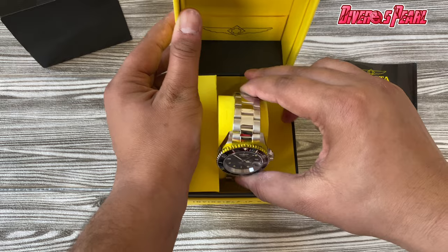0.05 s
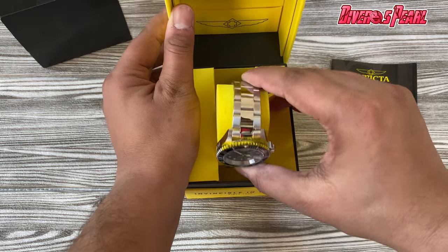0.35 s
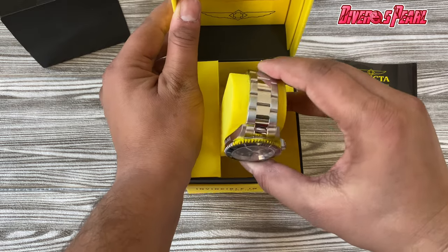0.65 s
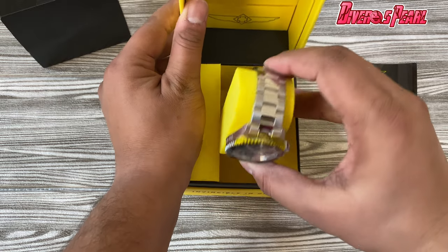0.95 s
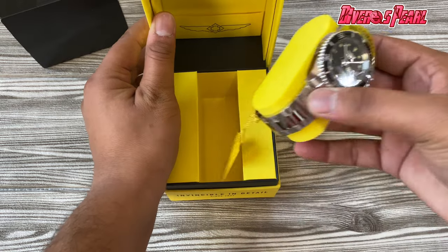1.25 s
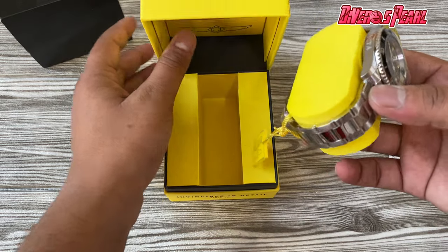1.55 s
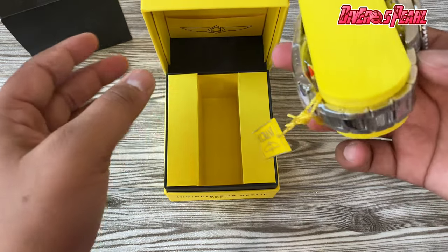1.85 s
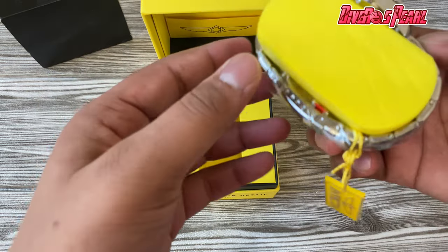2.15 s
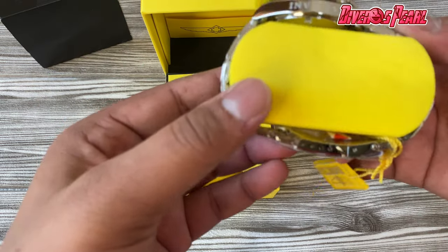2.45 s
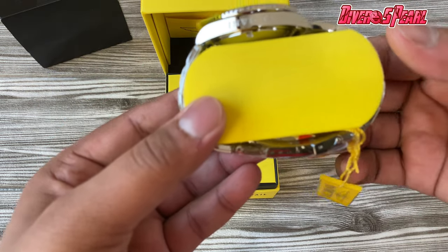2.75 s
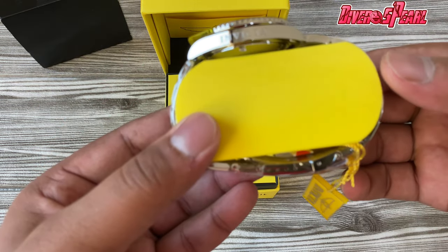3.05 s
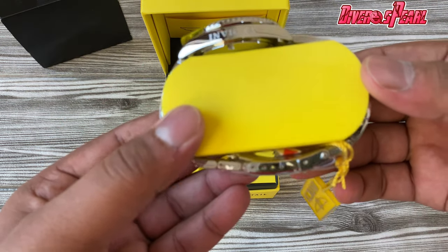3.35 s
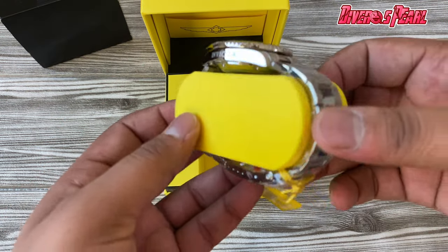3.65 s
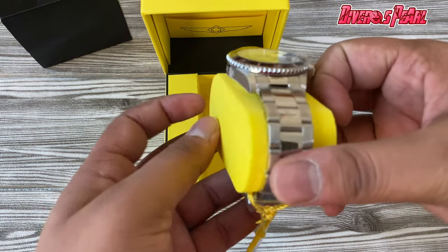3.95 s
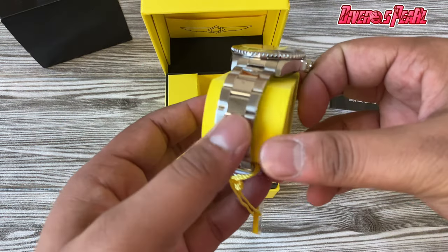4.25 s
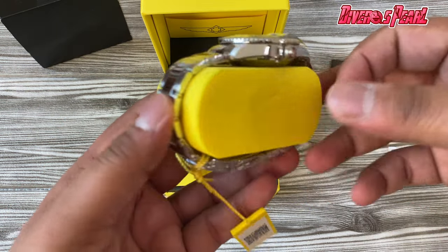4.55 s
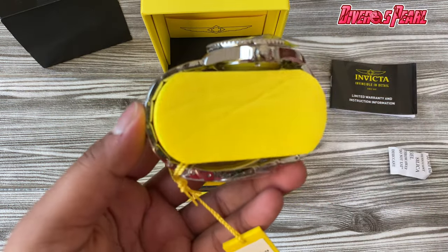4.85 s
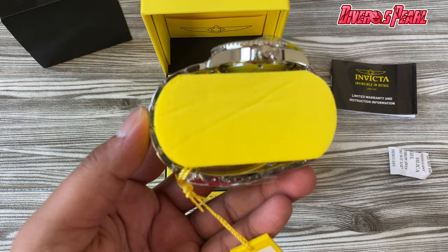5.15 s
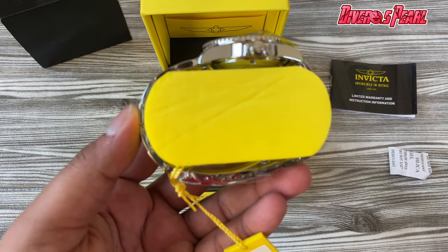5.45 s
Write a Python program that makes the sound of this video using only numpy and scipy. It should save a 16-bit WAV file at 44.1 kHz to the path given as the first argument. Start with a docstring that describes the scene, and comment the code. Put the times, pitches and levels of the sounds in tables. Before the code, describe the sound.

A wristwatch on a foam pillow scrapes out of a cardboard box, with taps, one sharp snap and small link ticks over a low hum.

```python
"""A foam pillow scrapes along cardboard walls as a steel wristwatch is worked out of its box, close to
one microphone in a small room. A hanging tag taps the box and the watch gives one sharp, hollow snap.
Then it is turned in the hands: bracelet links tick against each other and fingers brush the pillow.
The handling is nearly dry; a mains hum, low rumble and faint hiss lie behind it throughout."""
import sys
import numpy as np
from scipy import signal
from scipy.fft import rfft, irfft, next_fast_len
from scipy.io import wavfile
from scipy.ndimage import uniform_filter1d, map_coordinates

SR = 44100
rng = np.random.default_rng(int(sys.argv[2]) if len(sys.argv) > 2 else 0)


def materialize(psi):
    """Save the field psi as 16-bit PCM at rate SR to the path in sys.argv[1].

    A 1-D psi becomes a single channel; in a 2-D psi each row is a channel.
    """
    bounded = np.clip(np.atleast_2d(psi).T, -1, 1)
    quanta = np.round(bounded * 32767).astype(np.int16)
    wavfile.write(sys.argv[1], SR, quanta)


N = 247401

# decay of the room: freq_hz, t60_s
ROOM_DECAY = [(200, .4), (1100, 0.65), (2500, 0.56), (6000, 0.44), (14000, 0.54)]
# colour of the room's tail, its hiss and its rumble: freq_hz, relative_db
ROOM_COLOUR = [(200, 11.5), (700, 0.5), (1100, -1.5), (1600, -5.5), (2400, -2.5), (3500, -1), (7000, -5),
               (14000, -9.5)]
HISS = [(100, -16.5), (135, -7.5), (220, -14), (340, -21), (480, -21.5), (650, -25), (1000, -28.5),
        (1700, -33), (6500, -35.5), (10000, -37.5), (13300, -37), (15000, -45), (15800, -58)]
RUMBLE = [(20, -35.5), (35, -24), (48, -7.5), (58, 2), (70, -4), (82, -3.5), (120, -10), (160, -16.5)]
# mains hum and the room's wavering low tones, before the swell: pitch_hz, rms_db
MAINS_HUM = [(100, -46.5)]
LOW_TONES = [(65, -63), (145, -66.5), (191, -69.5), (219, -75), (269, -81)]
# slow swell of hum, low tones and rumble: time_s, gain_db
LOW_SWELL = [(0, -3), (.5, -1.5), (1.2, 0), (2.2, 0.5), (2.9, -2.3), (4, -2.5), (5.6, -2.5)]

# fingers brushing the pillow, and tugs along the box walls: top_speed_s, length_s, scrape_db, hollow_db
FINGER_STROKES = [(1.861, 0.024, -66.5, 3), (2.068, 0.018, -50, -4.5), (2.224, 0.014, -50.5, -3.5),
                  (2.33, 0.045, -77.5, 8.5), (2.485, .08, -61.5, 6.5), (2.533, 0.021, -59, -2),
                  (2.605, 0.087, -61.5, 4.5), (2.76, 0.19, -54, 4), (3.467, 0.043, -48.5, -0.5),
                  (3.638, 0.07, -51, -1), (3.833, 0.015, -60.5, -2), (3.963, 0.021, -55.5, 4.5),
                  (3.991, 0.024, -52, -3), (4.136, 0.048, -53, 0), (4.19, .05, -59.5, -3.5),
                  (4.4, 0.057, -53, -0.5), (4.44, 0.035, -49.5, -2), (4.98, 0.066, -66.5, 1.5)]
PILLOW_TUGS = [(.04, 0.12, -45, 5), (.135, 0.11, -45.5, 3.5), (.308, 0.063, -51, 1), (.385, .08, -40, 1),
               (.445, .07, -47.5, 3.5), (.54, 0.067, -54.5, -1), (.661, 0.049, -48.5, -3),
               (.813, .074, -41.5, 1.5), (.955, .054, -42.5, -2), (.983, 0.027, -39.5, -2.5),
               (1.087, 0.04, -48.5, 4)]
# hollow body and scrape of skin and of box wall, and the fizz of both: freq_hz, relative_db
SKIN_BODY = [(300, -15), (600, -2.5), (1050, -5.5), (1500, -1.5), (2100, 0.5), (2700, -5), (3400, -10.5)]
SKIN_SCRAPE = [(1700, -21), (2400, -2.5), (3200, -1.5), (4300, 0), (5200, -1), (7000, -7), (9000, -30)]
WALL_BODY = [(250, -15.5), (450, -20.5), (620, -9.5), (900, -4), (1200, -1.5), (1400, -8), (1650, -3),
             (2200, -4), (2700, -5.5), (3400, -25)]
WALL_SCRAPE = [(1700, -36), (2400, 0), (3000, 1.5), (4300, -0.5), (5800, -2.5), (7000, -9), (9000, -35)]
FIZZ = [(5500, -10), (7200, -1), (8500, 0), (10300, -1), (13000, 2), (14500, -0.5), (16000, -23)]

# dull taps of pillow and tag on the cardboard: start_s, level_db, pitch_hz
BOX_TAPS = [(.290, -42.5, 333), (.5228, -36, 790), (.5737, -27, 880), (.6735, -35.5, 825),
            (.8892, -33.5, 1113), (.992, -40, 286), (1.0435, -37, 923), (1.0625, -40.5, 702),
            (1.3113, -29.5, 760), (1.3547, -30, 820), (1.3668, -28, 792), (1.393, -37, 800),
            (1.4283, -28.5, 847)]
# modes of the cardboard: pitch_ratio, level_db, t60_s
BOX_MODES = [(0.992, 0, .015), (1.45, -8, 0.013), (.76, -9, .02)]
# spells in which the bracelet shifts: start_s, end_s, ticks_per_s, base_db
BRACELET_SHIFTS = [(1.1, 1.322, 35, -58.5), (2.03, 2.447, 24, -57.5), (3.719, 4.3, 24, -56),
                   (4.447, 4.664, 12, -59)]
# clear clicks of the links: start_s, level_db, brightness_db
LINK_CLICKS = [(.3249, -38.5, 14.5), (1.214, -42.5, 11), (1.2348, -27.5, 1), (1.3138, -33.5, 5.5),
               (1.3388, -34.5, 9.5), (1.5175, -34.5, -5), (1.5334, -40, 1), (2.1388, -46.5, -8.5),
               (2.1869, -47, -9), (2.1971, -39.5, -7), (2.3821, -53.5, 14), (2.8497, -44.5, 7),
               (3.8087, -50, 0.5), (3.9231, -43.5, 2.5), (4.0729, -40, -1), (4.5792, -50, 15),
               (4.5858, -38, 4), (5.1452, -46, -3)]
# low, middle and high band of a contact: freq_hz, relative_db
CLACK = [(500, -23.5), (1100, 2), (2100, -1.5), (3000, -1.5), (4500, -27.5)]
CLICK = [(2000, -21.5), (3500, -1), (6000, 1.5), (7500, 0.5), (10000, -22)]
TICK = [(6000, -21), (8500, -1), (13000, 3), (15000, 0.5), (16500, -12)]
# bright crack and hollow body of the snap: freq_hz, relative_db
SNAP_CRACK = [(2000, -26.5), (3400, -0.5), (4600, -6), (6400, 0), (8000, -3.5), (9600, -7), (11000, -4.5),
              (13000, -2.5), (14500, -4.5), (16500, -18)]
SNAP_BODY = [(450, -36), (620, -32.5), (780, -15.5), (930, -1.5), (1120, 1), (1380, -7), (1750, -7),
             (1950, -13), (2130, -8), (2400, -13.5), (3500, -31.5), (13000, -34.5), (16500, -46.5)]
# thin ring of the steel: pitch_hz, level_db, t60_s
STEEL_MODES = [(2121, -24.5, .028), (2964, -31.5, .022), (4500, -31.5, 0.025), (6740, -30, .016),
               (7730, -32.5, .018)]


def amp(db):
    return 10 ** (np.asarray(db) / 20)


def unit_rms(x):
    return x / np.sqrt(np.mean(x ** 2) + 1e-20)


def along(points, hz):
    """Read (freq_hz, value) points on a log frequency axis."""
    freqs, values = np.transpose(points)
    return np.interp(np.log(hz + 1), np.log(freqs), values)


def gain(spectrum, hz):
    """Gain of a spectrum, falling steeply beyond its ends."""
    low_hz, high_hz = spectrum[0][0] / 2, spectrum[-1][0] * 2
    skirts = (1 + (low_hz / (hz + 1)) ** 8) * (1 + (hz / high_hz) ** 8)
    return amp(along(spectrum, hz)) / np.sqrt(skirts)


def coloured(x, spectrum):
    """Shape x by a spectrum at zero phase and scale it to rms 1."""
    size = next_fast_len(len(x) + 8192)
    response = gain(spectrum, np.fft.rfftfreq(size, 1 / SR))
    return unit_rms(irfft(rfft(x, size) * response, size)[:len(x)])


def wobble(rate_hz):
    """A smooth random curve through rate_hz knots a second."""
    knots = rng.standard_normal(int(N * rate_hz / SR) + 4)
    return map_coordinates(knots, [np.arange(N) * rate_hz / SR])


def struck(force, spectrum):
    """A contact force through a causal filter, with the energy of a click peaking near 1."""
    size = len(force)
    cepstrum = irfft(np.log(gain(spectrum, np.fft.rfftfreq(size, 1 / SR)) + 1e-4))
    response = np.exp(rfft(2 * cepstrum[:size // 2], size))
    click = irfft(rfft(force) * response)
    return 2.3 * click / np.linalg.norm(click)


def decay(t, t60_s):
    return np.exp(-np.log(1000) * t / t60_s)


def burst(spectrum, t60_s, size=4096):
    """A sharp, fast-dying contact noise."""
    return struck(rng.choice([-1, 1], size) * decay(np.arange(size) / SR, t60_s), spectrum)


def ring(modes, attack_s, size=4096):
    """Damped modes that swell during the contact."""
    t = np.arange(size) / SR
    tones = sum(amp(db) * decay(t, t60_s) * np.sin(2 * np.pi * hz * t) for hz, db, t60_s in modes)
    return (1 - np.exp(-t / attack_s)) * tones


def add(track, start_s, x):
    part = track[round(start_s * SR):][:len(x)]
    part += x[:len(part)]


def room_tone():
    """The room by itself: a slightly unsteady mains hum, wavering low tones, rumble and hiss."""
    t = np.arange(N) / SR
    hum = sum(np.sqrt(2) * amp(db) * np.sin(2 * np.pi * hz * t + .046 * wobble(3))
              for hz, db in MAINS_HUM)
    drone = np.zeros(N)
    for hz, db in LOW_TONES:
        waver = amp(4.45 * wobble(5))
        drone += amp(db) * unit_rms(waver * np.sin(2 * np.pi * hz * t + 1.2 * wobble(5)))
    rumble = amp(-61.5) * coloured(rng.standard_normal(N), RUMBLE)
    hiss = amp(-64) * coloured(rng.standard_normal(N), HISS)
    swell = amp(np.interp(t, *np.transpose(LOW_SWELL)))
    return swell * (hum + drone + rumble) + hiss


def room_tail(x, delay_s=.0016, build_s=.002):
    """The small room's diffuse tail, in which each frequency dies at its own speed."""
    hz, frame_s, bands = signal.stft(rng.standard_normal(SR * 3 // 4), SR, nperseg=256)
    fade = decay(frame_s, along(ROOM_DECAY, hz)[:, None]) * amp(along(ROOM_COLOUR, hz))[:, None]
    tail = signal.istft(bands * fade, SR, nperseg=256)[1]
    age_s = np.maximum(np.arange(len(tail)) / SR - delay_s, 0)
    tail *= 1 - np.exp(-age_s / build_s)
    return signal.fftconvolve(x, tail / np.linalg.norm(tail))[:N]


def wall_echo(x, delay_s=.0167):
    """The nearest wall sends one duller reflection back to the microphone."""
    out = np.zeros(N)
    dulled = signal.sosfilt(signal.butter(1, 3500, fs=SR, output="sos"), x)
    add(out, delay_s, amp(-13) * dulled)
    return out


def friction(spectrum, grit_db, patchy_db):
    """Dense, uneven micro-slips; the gap between hand and pillow keeps shifting their colour."""
    slips = rng.standard_normal(N) * amp(grit_db * wobble(1500))
    bands = signal.stft(slips, nperseg=512)[2]
    patches = uniform_filter1d(rng.standard_normal(bands.shape), size=4, axis=0)
    patches = uniform_filter1d(patches, size=11, axis=1)
    shifting = signal.istft(bands * amp(patchy_db * unit_rms(patches)), nperseg=512)[1][:N]
    return coloured(shifting, spectrum)


def sliding(strokes, rise_share, steepness, body_db, body_growth, fizz_db, creep=0):
    """Envelopes of body, scrape and fizz: strokes swell and fade, louder and brighter when faster."""
    def band_power(scrape, hollow_db):
        # body_db holds at a scrape of -50 dB and grows by body_growth dB per dB
        body = amp(body_db + hollow_db) * (scrape / amp(-50)) ** body_growth
        return np.array([body, scrape, amp(fizz_db) * scrape]) ** 2

    t = np.arange(N) / SR
    power = band_power(creep + np.zeros(N), 0)
    for top_speed_s, length_s, scrape_db, hollow_db in strokes:
        near = np.abs(t - top_speed_s) < 3 * length_s
        offset_s = t[near] - top_speed_s
        flank_s = length_s * np.where(offset_s < 0, rise_share, 1 - rise_share)
        stroke = np.exp(-np.abs(offset_s / flank_s) ** steepness)
        power[:, near] += band_power(amp(scrape_db) * stroke, hollow_db)
    return np.sqrt(power) * amp(.89 * wobble(70))


def fingers():
    """Skin brushes the pillow as the watch is turned."""
    body, scrape, fizz = sliding(FINGER_STROKES, rise_share=.64, steepness=2.3,
                                 body_db=-58, body_growth=.53, fizz_db=-1.5)
    return (body * friction(SKIN_BODY, grit_db=2, patchy_db=3)
            + scrape * friction(SKIN_SCRAPE, grit_db=2.5, patchy_db=3.5)
            + fizz * friction(FIZZ, grit_db=2.5, patchy_db=3))


def pillow(creep_db=-67.5, clear_s=1.11, release_s=.01):
    """The pillow is tugged along the box walls and creeps between tugs until it comes clear."""
    inside = .5 - .5 * np.tanh((np.arange(N) / SR - clear_s) / release_s)
    body, scrape, fizz = sliding(PILLOW_TUGS, rise_share=.53, steepness=2.5, body_db=-48.5,
                                 body_growth=.6158, fizz_db=-3, creep=amp(creep_db) * inside)
    return (body * friction(WALL_BODY, grit_db=1, patchy_db=2)
            + scrape * friction(WALL_SCRAPE, grit_db=1, patchy_db=2.5)
            + fizz * friction(FIZZ, grit_db=1, patchy_db=1))


def box_taps(chatter_gap_s=.013, chatter_db=-8, loss_db=.5):
    """Soft contacts ring the cardboard at a pitch set by the spot hit; the tag chatters to rest."""
    out = np.zeros(N)
    last_s, last_db, last_hz = BOX_TAPS[-1]
    chatter = [(last_s + chatter_gap_s * (k + 1), last_db + chatter_db - loss_db * k, last_hz)
               for k in range(3)]
    for start_s, level_db, pitch_hz in list(BOX_TAPS) + chatter:
        modes = [(pitch_hz * ratio, db + rng.normal(0, 1), t60_s) for ratio, db, t60_s in BOX_MODES]
        knock = ring(modes, attack_s=.0009)
        # the small panel radiates little below its lowest mode
        knock = signal.sosfilt(signal.butter(2, pitch_hz * .6, "high", fs=SR, output="sos"), knock)
        contact = amp(-13.5) * burst(CLACK, t60_s=.012) + amp(-20.5) * burst(CLICK, t60_s=.01)
        add(out, start_s, amp(level_db) * (knock / np.abs(knock).max() + contact))
    return out


def bracelet_ticks():
    """The bracelet shifts in the hands with tiny random ticks."""
    out = np.zeros(N)
    for start_s, end_s, ticks_per_s, base_db in BRACELET_SHIFTS:
        length_s = end_s - start_s
        for when, strength in rng.random((round(length_s * ticks_per_s), 2)):
            tick = burst(TICK, t60_s=.0084) + .63 * burst(CLICK, t60_s=.008)
            add(out, start_s + when * length_s, amp(base_db + 5 + 10 * strength) * tick)
    return out


def link_clicks():
    """Steel links touch, damped at once by the pillow; a harder contact trades clack for tick."""
    out = np.zeros(N)
    for start_s, level_db, brightness_db in LINK_CLICKS:
        add(out, start_s, amp(level_db - brightness_db - 2.5) * burst(CLACK, t60_s=.014))
        add(out, start_s, amp(level_db) * burst(CLICK, t60_s=.011))
        add(out, start_s, amp(level_db + brightness_db - 1.1) * burst(TICK, t60_s=.0082))
    return out


def watch_snap(start_s=1.5368):
    """A crack, a hollow clack and a trace of steel: one path to the microphone, one into the room."""
    blow = signal.unit_impulse(4096)
    clack = amp(1.5) * struck(blow, SNAP_BODY) + amp(2.5) * ring(STEEL_MODES, attack_s=.00035)
    direct, spread = np.zeros((2, N))
    add(direct, start_s, amp(-6.5) * burst(SNAP_CRACK, t60_s=.0068))
    add(direct, start_s + .0003, clack)
    # summed over all directions, the crack has a smooth spectrum
    add(spread, start_s, amp(-6) * struck(blow, SNAP_CRACK) + clack)
    return direct, spread


def scene():
    """The hands are close to the microphone, so the room answers well below the direct sound."""
    rubbing = pillow() + fingers()
    taps = box_taps()
    ticks = link_clicks() + bracelet_ticks()
    snap, snap_spread = watch_snap()
    into_room = amp(-18) * rubbing + amp(-12.5) * taps + amp(-15) * ticks + amp(-15.5) * snap_spread
    reflections = wall_echo(into_room) + room_tail(into_room)
    return (rubbing + taps + ticks + snap + reflections + room_tone())[None]


def record(dry):
    """One microphone channel, cut steeply in the top treble: 80 dB down from 17.2 kHz."""
    return signal.sosfilt(signal.cheby2(14, 80, 17200, fs=SR, output="sos"), dry)


dry = scene()
out = record(dry)
materialize(out)
```